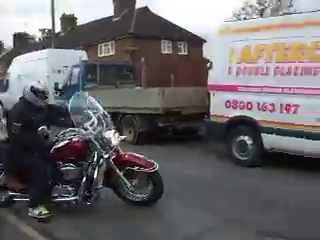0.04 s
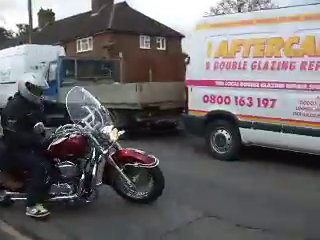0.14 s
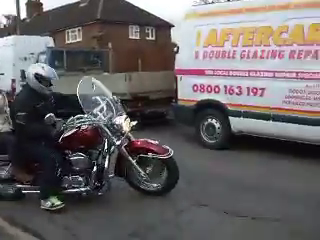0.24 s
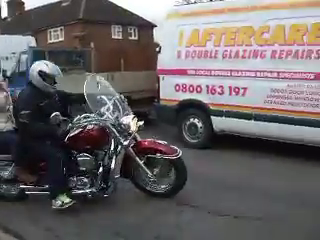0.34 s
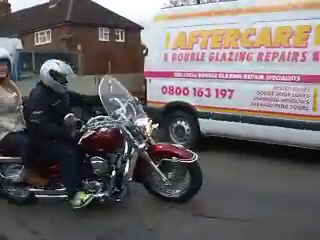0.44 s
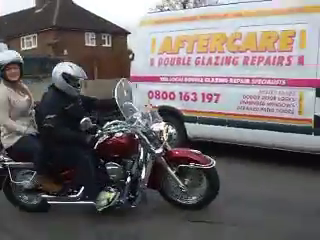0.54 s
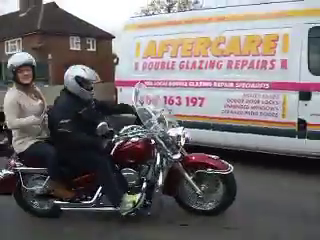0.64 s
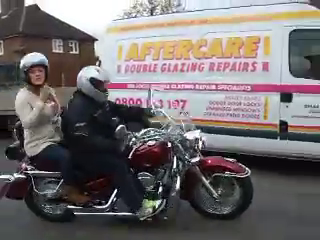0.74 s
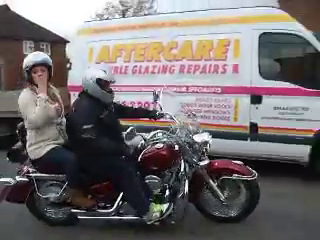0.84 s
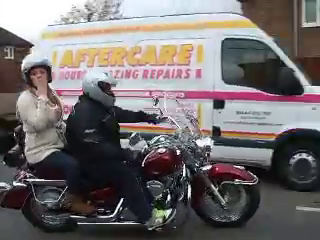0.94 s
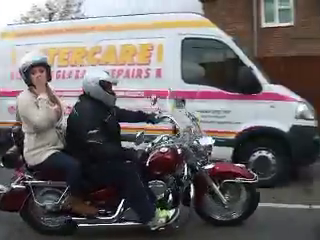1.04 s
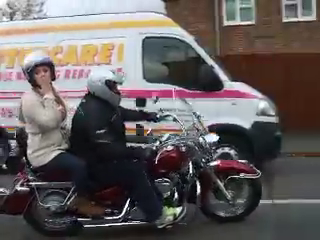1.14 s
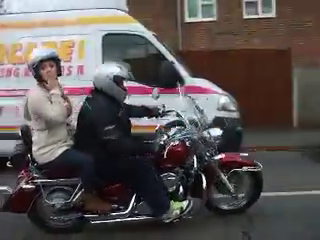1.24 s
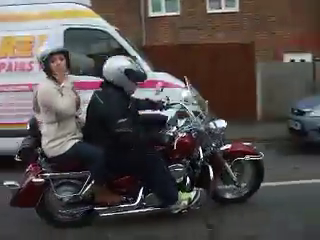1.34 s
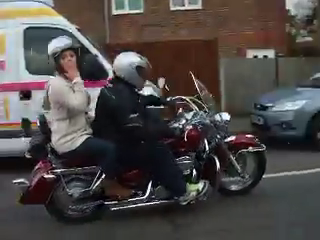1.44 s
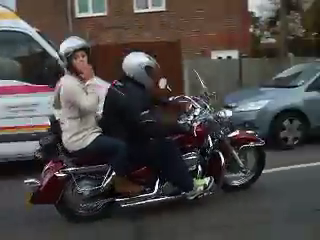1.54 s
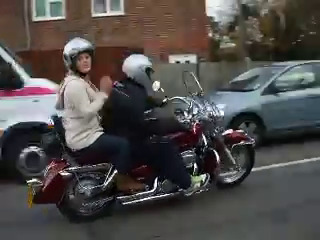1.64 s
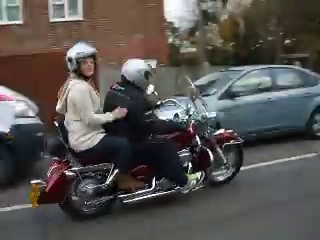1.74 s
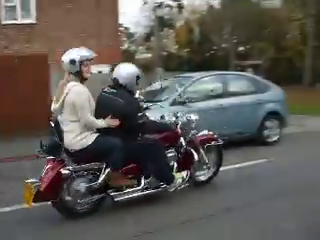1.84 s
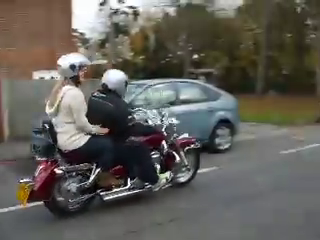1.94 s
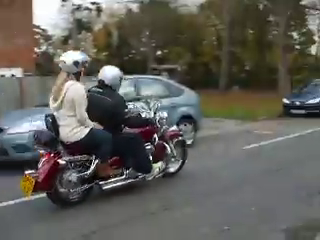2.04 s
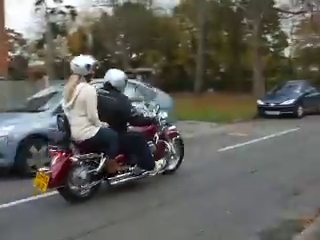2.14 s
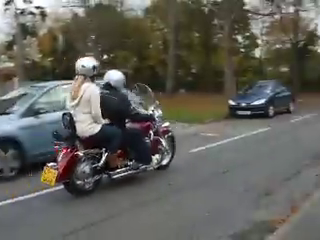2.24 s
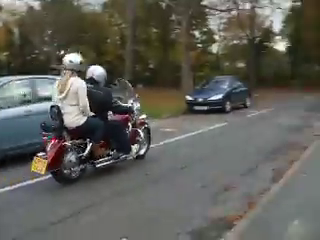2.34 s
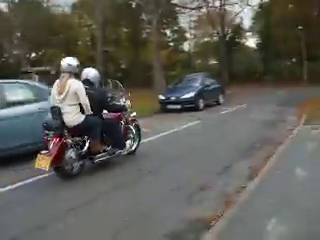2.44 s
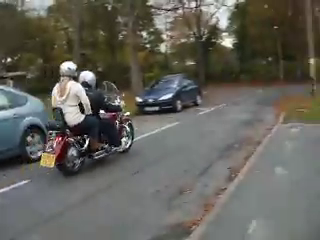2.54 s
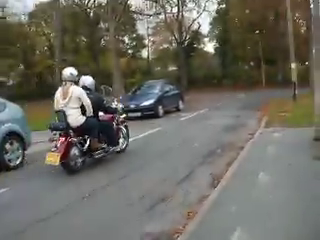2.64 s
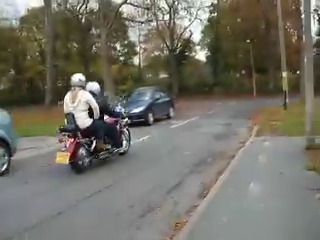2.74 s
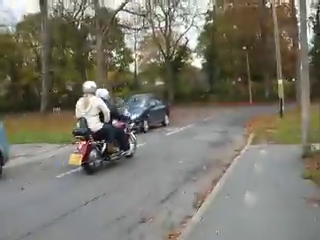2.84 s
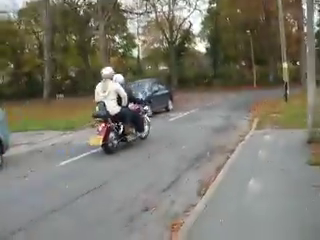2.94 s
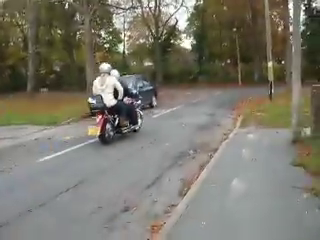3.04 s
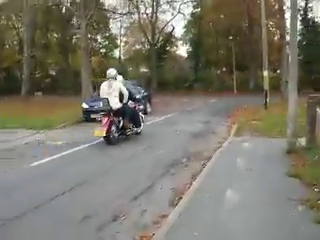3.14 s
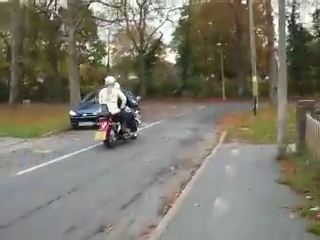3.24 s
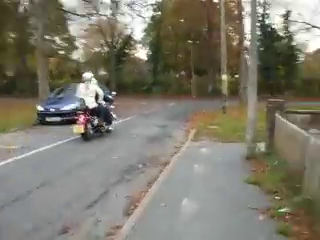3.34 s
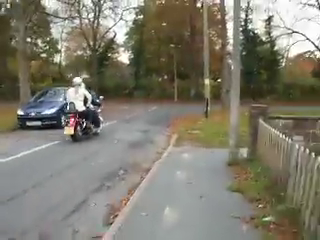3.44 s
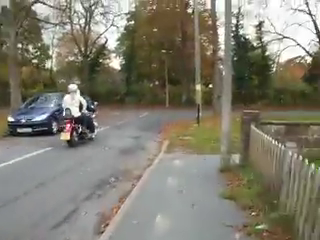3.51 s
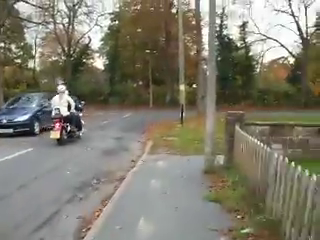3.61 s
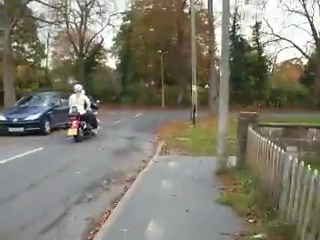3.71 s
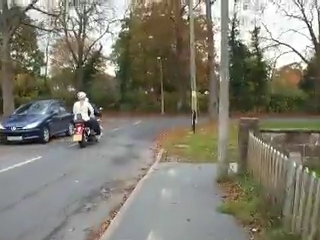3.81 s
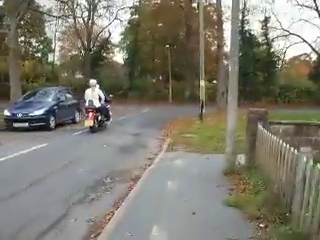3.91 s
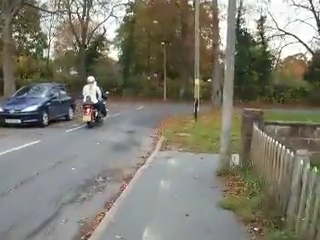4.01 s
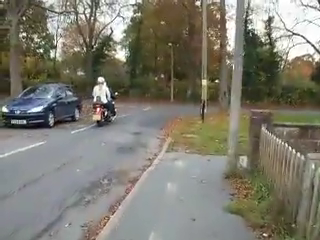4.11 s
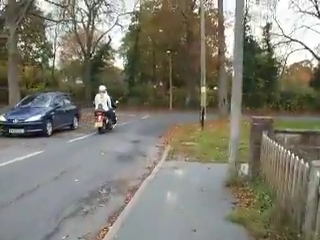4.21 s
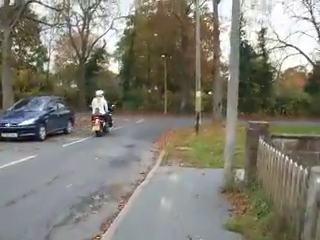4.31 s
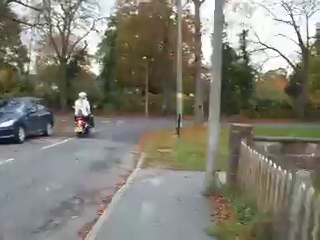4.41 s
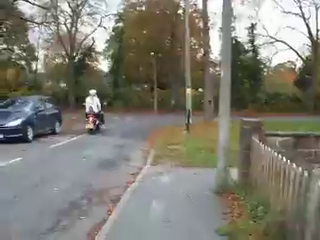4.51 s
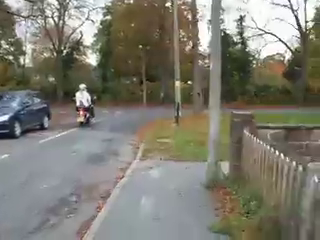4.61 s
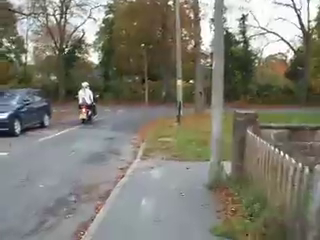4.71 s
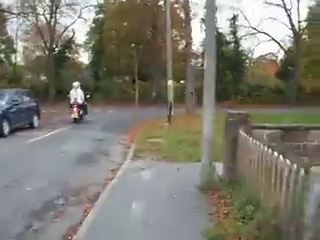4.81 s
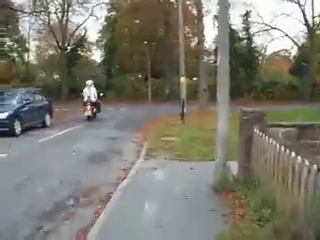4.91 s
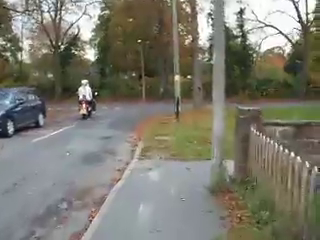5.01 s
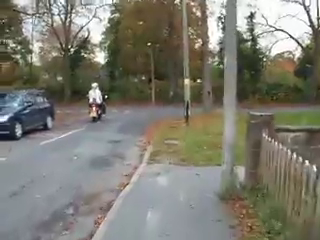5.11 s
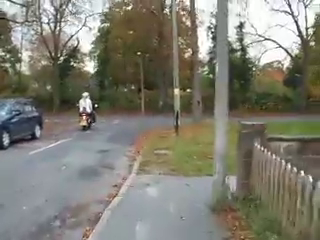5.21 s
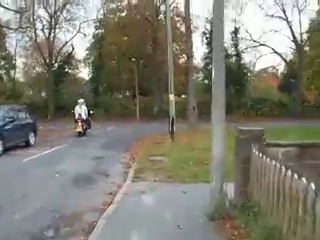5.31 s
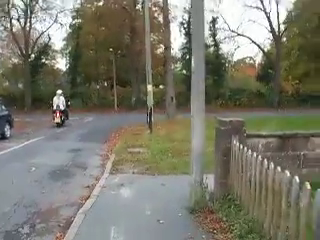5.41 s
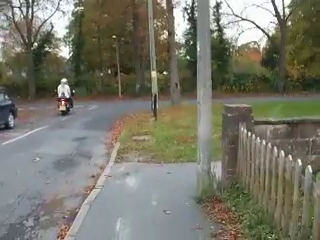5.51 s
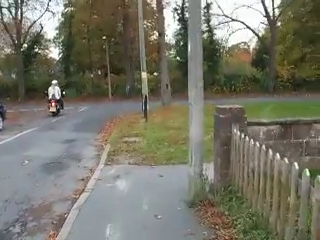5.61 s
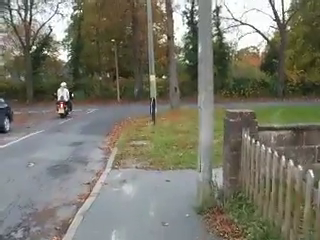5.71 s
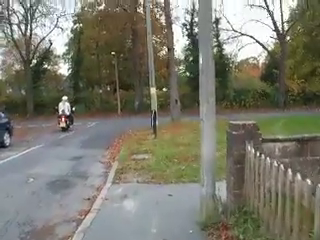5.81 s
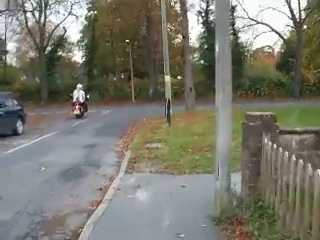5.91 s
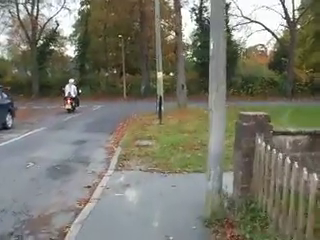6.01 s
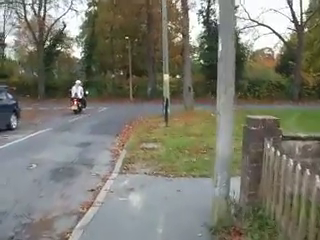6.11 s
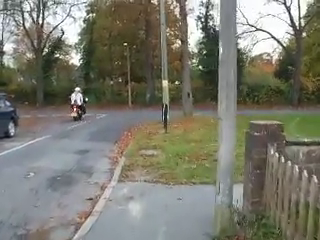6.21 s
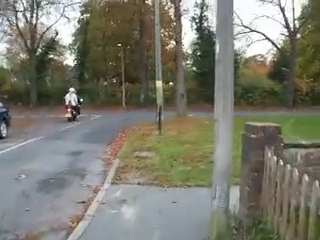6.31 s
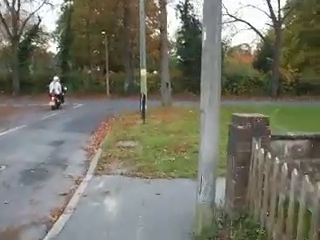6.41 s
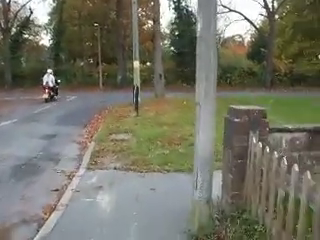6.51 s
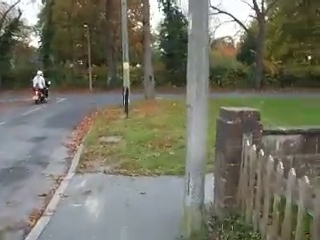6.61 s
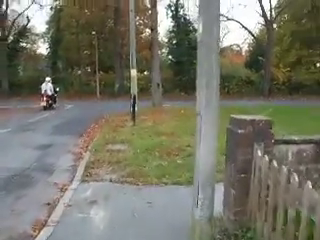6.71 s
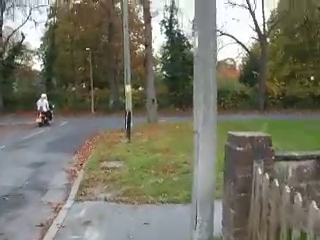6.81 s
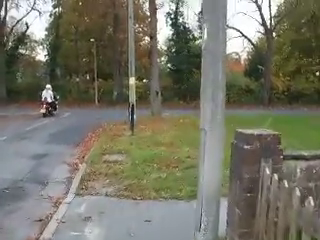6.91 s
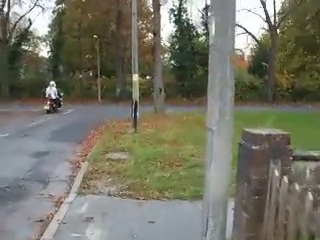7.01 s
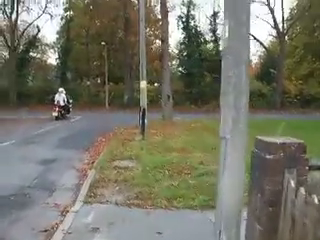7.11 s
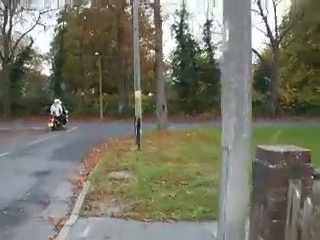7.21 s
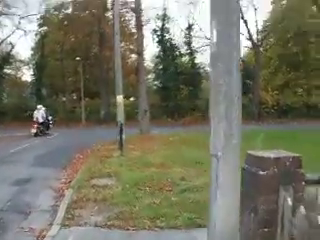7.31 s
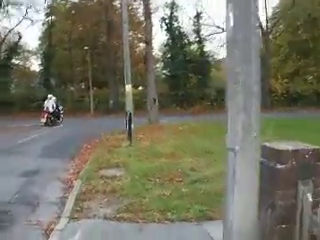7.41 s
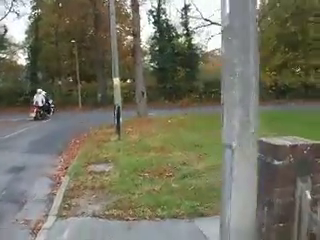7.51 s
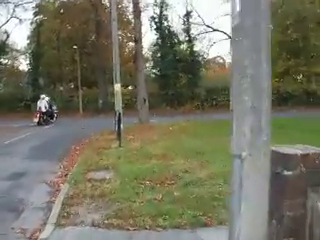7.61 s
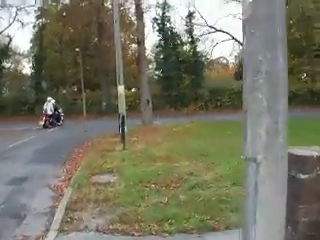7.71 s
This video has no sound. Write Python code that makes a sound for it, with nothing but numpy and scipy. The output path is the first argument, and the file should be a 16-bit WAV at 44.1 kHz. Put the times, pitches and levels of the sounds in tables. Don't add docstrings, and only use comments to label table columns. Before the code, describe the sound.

A suburban street, heard from the kerb on a small camera with dull, narrow sound. From 0 s a twin-cylinder cruiser motorcycle with open pipes pulls away very close: heavy, uneven low puffs, a boomy chamber drone around 0.7 s, gas rasp bouncing off a van's flank, and the loudest beats clipping. From about 1.1 to 2.9 s the revs climb steadily, the beats merging into a tighter growl; from 2.2 s the pipes swing toward the microphone and the cracks become clearer. Around 3 s the throttle closes, revs drop quickly and wake air buffets. From 3.5 to 5.9 s it coasts away at a lumpy idle, with wind thumps strongest at 4.4 and 4.8-5.2 s, over far traffic hum and faint leaf hiss. A brief blip at 6 s falls back to idle by 6.5 s; from 6.9 s it accelerates again, distant and echoing, as another gust rises towards 7.7 s.

```python
import sys
import numpy as np
from scipy import signal
from scipy.fft import rfft, irfft
from scipy.io import wavfile
from scipy.ndimage import uniform_filter1d

SR = 44100
rng = np.random.default_rng(int(sys.argv[2]) if len(sys.argv) > 2 else 0)


def log_audio(samples):
    frames = np.atleast_2d(samples).T
    limited = np.clip(frames, -1, 1)
    pcm = np.round(limited * 32767).astype(np.int16)
    wavfile.write(sys.argv[1], SR, pcm)


def undo_db(level):
    steps = np.asarray(level, float) / 20
    return 10 ** steps


N = 341775
T, HZ = np.arange(N) / SR, np.fft.rfftfreq(2 * N, 1 / SR)

# (frequency [Hz], density [dB per Hz])
TOWN_SPECTRUM = [(15, -32.5), (25, -4), (120, -1.5), (274, -8.5), (432, -11), (608, -14), (916, -35),
                 (1200, -21), (1940, -35.5), (3210, -36), (5060, -43), (5800, -45.5), (7540, -92),
                 (12800, -120)]
# (frequency [Hz], width [Hz], level [dB])
KERB_ROAR = [(736, 230, -1), (639, 70, -1.5)]
TOWN_NEAR_DB, TOWN_FAR_DB = -32, -29.5
TOWN_DUCK_DB, DUCK_S, RECOVER_S = -3, 2.8, 0.48
RELEASE_S = 3.38
GEAR_DB, LEAVES_DB = -41, -54.5
BRANCH_SHAKE = (3.87, -49, .08)  # (time [s], level [dB], width [s])

# (time [s], peak [dB], width [s])
GUSTS_AT_MIC = [(3.05, -34, 0.092), (3.5, -32.5, 0.65), (4.4, -30, 0.3), (4.92, -24.5, 0.12),
                (5.12, -25.5, 0.094), (5.65, -38.5, 0.1), (5.98, -28, 0.085), (6.41, -27, 0.065),
                (6.25, -44, 0.045), (7.0, -35.5, 0.31), (7.7, -24, 0.53)]
# (time [s], peak [dB], frequency [Hz])
LONE_BUFFETS = [(4.371, -13, 230), (4.406, -11, 300), (4.437, -13, 200), (4.794, -12, 130),
                (4.888, -12, 250), (4.943, -12, 220), (5.2243, -8.5, 150), (6.306, -15, 100),
                (7.031, -12, 80)]
OVERRUN_BOOM = (3.13, -24, .3)
BOOM_HZ, BOOM_WIDTH_HZ = 74.4, 57

# (time [s], exhaust level at open throttle [dB], throttle [0-1])
RIDE_LEVELS = [(0, -6.5, 0.57), (1, -12, 0.88), (1.8, -13, 1), (2.4, -13.5, 0.99), (2.945, -11, 0.58),
               (2.97, -11.5, 0.23), (3.3, -21, 0), (3.8, -18.5, 0.16), (4.4, -23, 0.22), (5.0, -18.5, 0.15),
               (5.4, -29, 0.44), (5.93, -31.5, 0.62), (5.99, -23.5, 0.95), (6.075, -20.5, 0.89),
               (6.11, -18.5, 0.03), (6.4, -27.5, 0.07), (6.85, -33, 0.88), (7.15, -24, 0.96)]
# (time [s], speed [rev per min])
CRANK_SPEED = [(-0.01, 1382.9), (0.546, 1439.5), (1.054, 1307.1), (1.602, 1581.0), (2.08, 1816.5),
               (2.474, 2018.2), (2.93, 2272.9), (3.283, 1496.7), (3.472, 1100.6), (3.912, 1075.0),
               (5.287, 1059.6), (5.307, 1046.8), (5.947, 1012.9), (6.018, 1507.2), (6.482, 973.2),
               (6.943, 999.3), (7.056, 1363.3), (7.226, 1535.7)]
START_S, START_CYCLE, CYCLES = -.01, -.0072, 89
TURN_S, TURN_LENGTH_S, TURN_MOST = 2.193, 1.06, 0.99
WET_NEAR_DB, WET_FAR_DB = -9.5, -6

# (round trip [ms], share sent back [0-1], puff corner [Hz], puff [dB], crack [dB],
# crack pitch [factor])
TWO_PIPES = [
    (11.1, 0.28, 202, 1, 5.5, 0.941),
    (8.75, 0.46, 210, 1.5, 3, 1.052),
]
REAR_LAG, REAR_LEAD_S = 315 / 720, .00185
# (frequency [Hz], width [Hz], level [dB])
BAFFLE_RINGS = [(80.7, 16, 1.5), (179.4, 25, -5), (279, 54, -4)]
# (frequency [Hz], width [Hz], from the side [dB], from behind [dB])
CHAMBER = [
    (130.2, 20, -2, -24.5),
    (120.74, 16.6, -16, 3),
]
CHAMBER_LAG_MS, CHAMBER_FRONT = (7.2, 14.72), .15
LUGGING_RPM, DRONE_DB_PER_OCTAVE = 1182, -33
DRONE_LEAST_DB, DRONE_MOST_DB, DRONE_BEHIND_DB = -14.5, -0.5, 3
DRONE_STEADY = 0.71
CLUTCH_BOOM = (0.69, -5.5, 0.27)
# (frequency [Hz], width [Hz], from the side [dB], from behind [dB])
RASP_MODES = [(630, 142, 0.5, 11.5), (758, 205, 8.5, -31), (1430, 450, -0.5, -16.5), (315.4, 112, 13.5, -5)]
# (frequency [Hz], width [Hz], from the side [dB], from behind [dB])
CRACK_MODES = [(1492, 590, 3, -2), (2340, 120, -10.5, 4.5), (2910, 680, 17, -5.5), (3192, 410, 11.5, 3.5),
               (4250, 800, 2.5, -25.5)]
PUFF_SHUT_DB = -14
# (from the side [dB], from behind [dB], loss at closed throttle [dB])
RASP_DB, CRACK_DB = (-11, 1.5, -5), (-22.5, -14, -14)
RASP_DB_PER_OCTAVE, CRACK_DB_PER_OCTAVE = -9, 0.5
START_RASP = (0.071, -4.5, 0.44)


def curve(rows):
    s, *columns = np.transpose(rows)
    return [np.interp(T, s, column) for column in columns]


def unit(x):
    return x / np.sqrt(np.mean(x ** 2))


def shape(x, response):
    return irfft(rfft(x, 2 * N) * response)[:N]


def resonances(modes):
    return sum(undo_db(db) * 1j * HZ * w / (f * f - HZ ** 2 + 1j * HZ * w) for f, w, db in modes)


def clicks(times, sizes):
    out = np.zeros(N)
    keep = (times >= 0) & (times < N / SR)
    np.add.at(out, (times[keep] * SR).astype(int), sizes[keep])
    return out


def walk(rate):
    k = int(SR / rate)
    held = np.repeat(rng.standard_normal(N // k + 1), k)
    return 0.47 * uniform_filter1d(uniform_filter1d(held, k), k)[:N]


def swells(rows):
    return sum(undo_db(db) * np.exp(-((T - s) / width) ** 2) for s, db, width in rows)


def turned():
    return TURN_MOST * np.clip((T - TURN_S) / TURN_LENGTH_S, 0, 1)


def town():
    hz, db = np.transpose(TOWN_SPECTRUM)
    noise = rfft(rng.standard_normal(N), 2 * N) * undo_db(np.interp(np.log(HZ + 1), np.log(hz), db))
    noise = noise * (1 + resonances(KERB_ROAR))
    out, swell = 0, walk(0.13)
    for octave in np.arange(4.5, 13, .5):
        band = np.clip(1 - 2 * np.abs(np.log2(HZ + 1) - octave), 0, 1)
        out = out + undo_db(0.23 * swell + 2.2 * walk(14)) * irfft(noise * band)[:N]
    gain_times = [RELEASE_S - DUCK_S, RELEASE_S, RELEASE_S + RECOVER_S]
    gain_db = np.interp(T, gain_times, [TOWN_NEAR_DB, TOWN_NEAR_DB + TOWN_DUCK_DB, TOWN_FAR_DB])
    return undo_db(gain_db) * unit(out)


def rustle():
    port = resonances([(2900, 1400, 7), (4720, 180, 1.5), (1650, 1500, -3.5)])
    hiss = shape(rng.standard_normal(N), port)
    valve_gear = undo_db(GEAR_DB + curve(RIDE_LEVELS)[0]) * (1 - turned())
    level = valve_gear + undo_db(LEAVES_DB) + swells([BRANCH_SHAKE])
    return level * undo_db(3.9 * walk(9)) * unit(hiss)


def wind():
    when, side, rarity = rng.random((1200, 3)).T
    sizes = undo_db(np.minimum(-3.0 * np.log(rarity), 11))
    eddies = clicks(when * N / SR, np.sign(side - .5) * sizes)
    gust = shape(eddies, resonances([(173, 153, 0)]) / (1 + (HZ / 450) ** 2))
    boom = shape(eddies, resonances([(BOOM_HZ, BOOM_WIDTH_HZ, 0)]) ** 2)
    out = swells(GUSTS_AT_MIC) * unit(gust) + swells([OVERRUN_BOOM]) * unit(boom)
    for s, db, hz in LONE_BUFFETS:
        u = (T - s) * hz * 2 * np.pi
        out = out - undo_db(db) * np.sqrt(np.e) * u * np.exp(-u * u / 2)
    return out


def street(x):
    t = T[:SR // 2]
    slaps = rng.standard_normal(len(t)) * undo_db(3.1 * rng.standard_normal(len(t)))
    tail = slaps * undo_db(-60 * t / 0.43) * (t > .012)
    sent = x * undo_db(WET_NEAR_DB + turned() * (WET_FAR_DB - WET_NEAR_DB))
    return signal.fftconvolve(sent, tail / np.sqrt(np.sum(tail ** 2)))[:N]


def firing_times(cycles):
    t = np.arange(round(START_S * SR), N + SR) / SR
    rpm = np.interp(t, *np.transpose(CRANK_SPEED))
    done = START_CYCLE + np.cumsum(rpm) / (2 * 60 * SR)
    return np.interp(cycles, done, t)


def exhaust():
    level_db, throttle = curve(RIDE_LEVELS)
    shut, away = 1 - throttle, turned()
    octaves = np.log2(curve(CRANK_SPEED)[0] / LUGGING_RPM)
    boom_db = DRONE_DB_PER_OCTAVE * octaves * (1 - DRONE_STEADY * away)
    drone_db = np.clip(boom_db, DRONE_LEAST_DB, DRONE_MOST_DB) + DRONE_BEHIND_DB * away
    puff_db = level_db + PUFF_SHUT_DB * shut
    rasp_db, crack_db = (puff_db + side + away * (behind - side) + loss * shut
                         for side, behind, loss in (RASP_DB, CRACK_DB))
    rasp_db = rasp_db + RASP_DB_PER_OCTAVE * octaves
    crack_db = crack_db + CRACK_DB_PER_OCTAVE * octaves
    return puff_db, drone_db, rasp_db, crack_db, away


def burst(rise_ms, fall_ms, tail_ms, tail_db):
    ms = np.arange(SR // 10) * 1000 / SR
    fall = np.exp(-ms / fall_ms) + undo_db(tail_db) * np.exp(-ms / tail_ms)
    return (1 - np.exp(-ms / rise_ms)) ** 2 * fall


def gas(times, sizes, modes, pitch, away, scatter_db, envelope):
    flow, out = rng.standard_normal(N), 0
    chance = rng.standard_normal((len(times), len(modes))).T
    for (hz, width, side_db, behind_db), luck in zip(modes, chance):
        gate = signal.fftconvolve(clicks(times, undo_db(scatter_db * luck)), envelope)[:N]
        ring = shape(gate * flow, resonances([(pitch * hz, 1.53 * width, 0)]) ** 2)
        out = out + undo_db(side_db + away * (behind_db - side_db)) * ring
    firing = np.clip(np.searchsorted(times, T) - 1, 0, None)
    energy = np.bincount(firing, out ** 2, len(times)) + 1e-9
    return out * (sizes / np.sqrt(energy))[firing]


def chamber_drone(fired, away):
    out = 0
    for (hz, width, side_db, behind_db), lag_ms in zip(CHAMBER, CHAMBER_LAG_MS):
        delay = np.exp(-2j * np.pi * HZ * lag_ms / 1000)
        ring = shape(fired, -1j * resonances([(hz, width, 0)]) ** 2 * delay)
        out = out + undo_db(side_db + away * (behind_db - side_db)) * unit(ring)
    return out


def engine():
    puff_db, drone_db, rasp_db, crack_db, away = exhaust()
    puff, fired, rasp, crack = 0, 0, 0, 0
    for k, (trip_ms, back, corner_hz, size_db, gas_db, pitch) in enumerate(TWO_PIPES):
        cycles = np.arange(CYCLES) + k * REAR_LAG
        late, puff_luck, gas_luck = rng.standard_normal((len(cycles), 3)).T * [[.00012], [.45], [1.8]]
        times = firing_times(cycles) - k * REAR_LEAD_S + late
        period = np.sqrt(np.gradient(times))
        pulses = clicks(times, period * undo_db(size_db + puff_luck))

        echo = back * np.exp(-2j * np.pi * HZ * trip_ms / 1000) / (1 + (HZ / 260) ** 2)
        no_deep_bass = 1 / np.sqrt(1 + (70 / (HZ + 1)) ** 6)
        mouth = no_deep_bass * (1 + resonances(BAFFLE_RINGS)) / (1 - echo)
        blunt = shape(pulses, mouth * np.exp(-(HZ / corner_hz) ** 2))
        sharp = shape(pulses, mouth * np.exp(-(HZ / (1.51 * corner_hz)) ** 2))
        puff = puff + (1 - away) * blunt + 0.73 * away * sharp

        fired = fired + pulses * (1 if k else CHAMBER_FRONT * (1 - 0.46 * away))
        blast = period * undo_db(gas_db + gas_luck)
        rasp = rasp + gas(times - .0028, blast, RASP_MODES, 1, away, 1.5, burst(.8, 2.0, 25, -14))
        crack = crack + gas(times - .0025, blast, CRACK_MODES, pitch, away, 4.0, burst(1.0, 1.0, 8, -24))
    drone = (undo_db(drone_db) + swells([CLUTCH_BOOM])) * chamber_drone(fired, away)
    low = undo_db(puff_db - 2.0) * (unit(puff) + drone)
    body = low + undo_db(rasp_db - 5.0) * (1 + swells([START_RASP])) * unit(rasp)
    return body, undo_db(crack_db + 4.5) * unit(crack)


def scene():
    body, crack = engine()
    answer = street(body + undo_db(-14.5) * crack)
    return (town() + rustle() + wind() + answer + body + crack)[None]


def low_pass(x):
    return signal.sosfilt(signal.butter(12, 16500, fs=SR, output="sos"), x)


def record(dry):
    headroom, top_hz = 1.486, 5600
    soft = headroom * np.tanh(dry / headroom)
    narrow = signal.sosfiltfilt(signal.butter(12, top_hz, fs=SR, output="sos"), soft)
    mix = np.clip(narrow - .0025, -.705, .705)
    return low_pass(mix)


dry = scene()
out = record(dry)
log_audio(out)
```